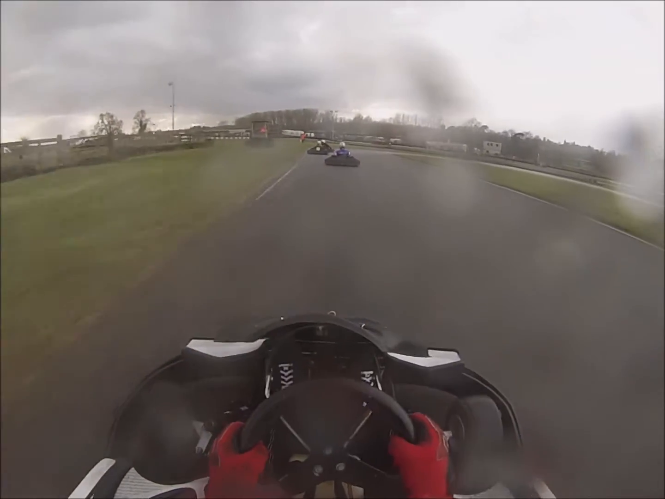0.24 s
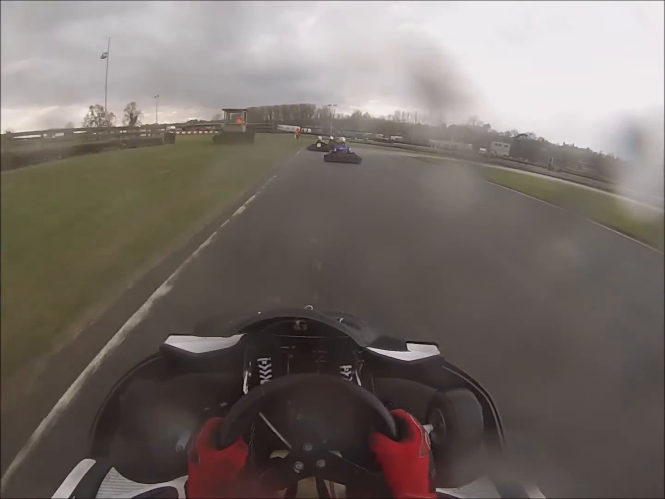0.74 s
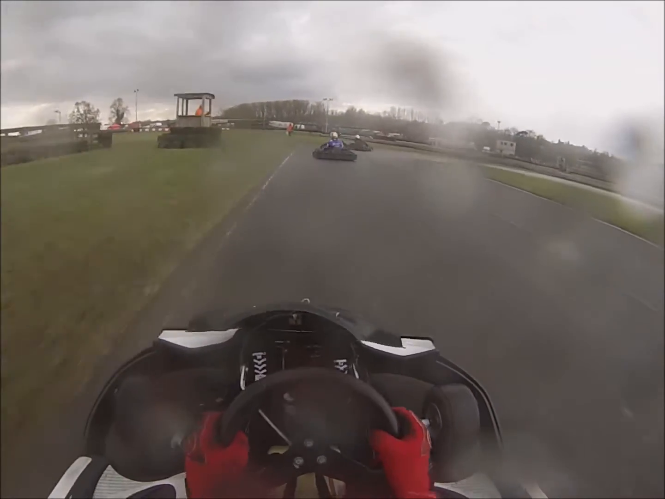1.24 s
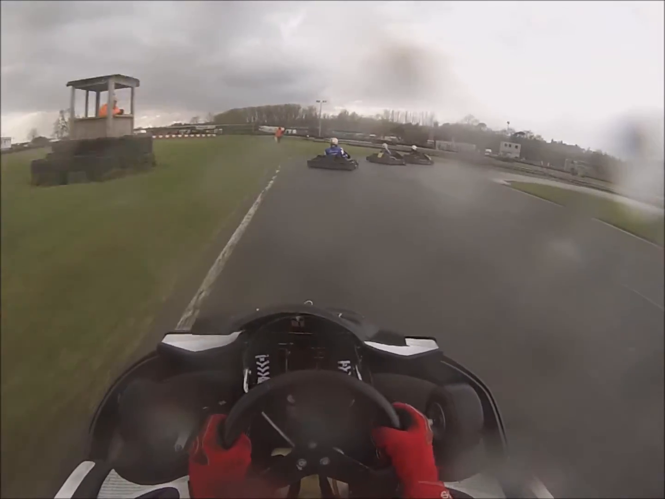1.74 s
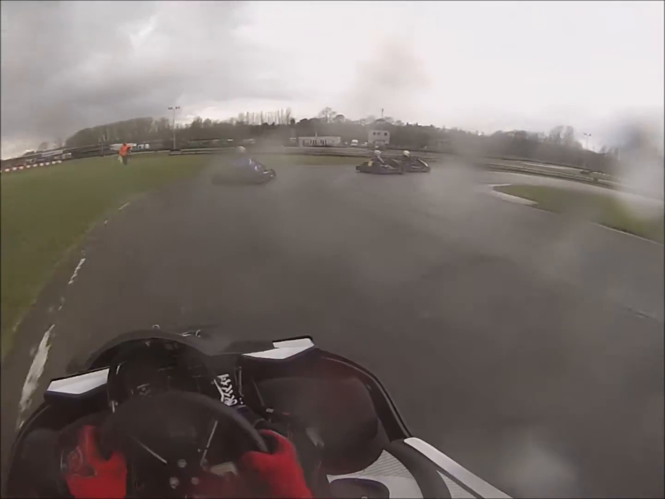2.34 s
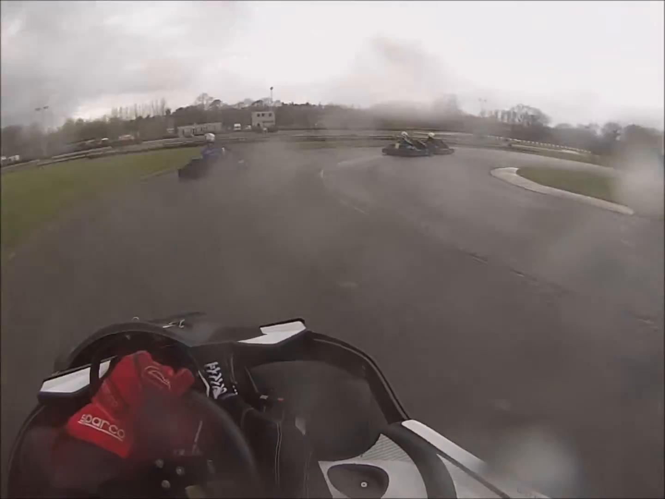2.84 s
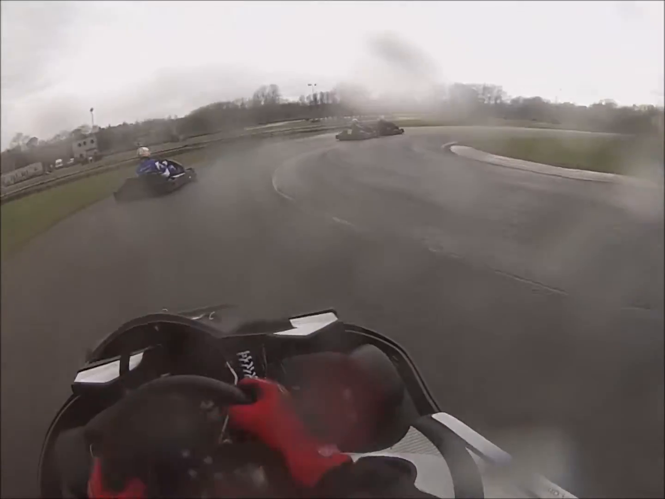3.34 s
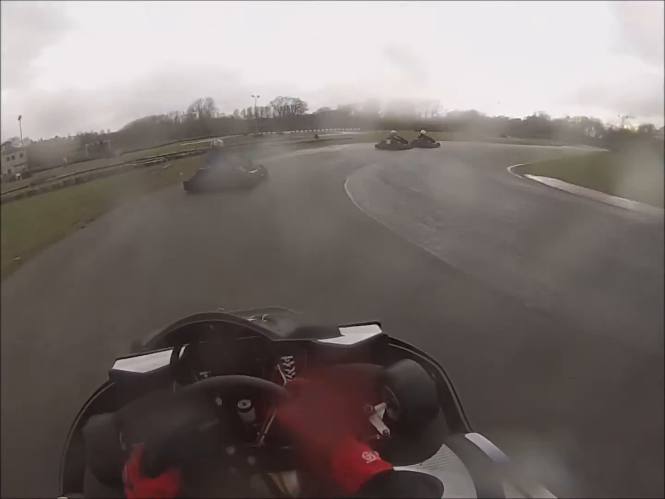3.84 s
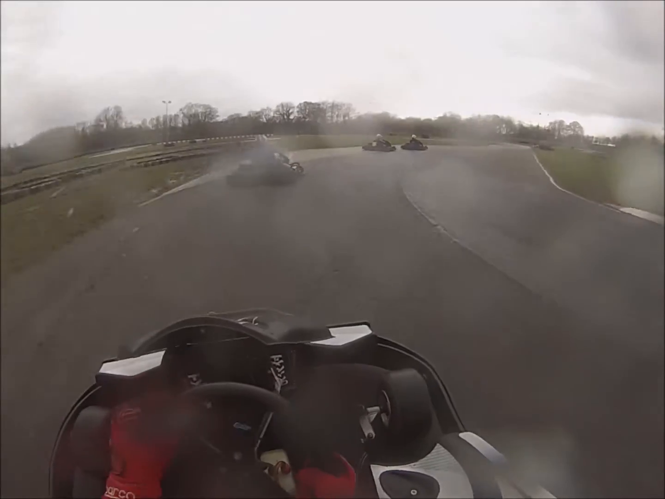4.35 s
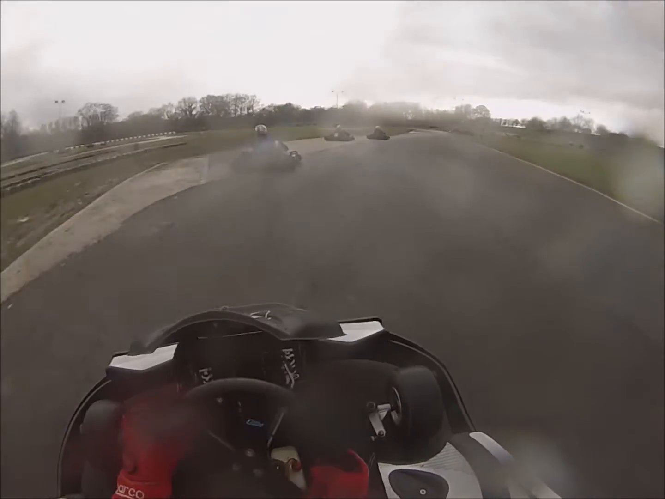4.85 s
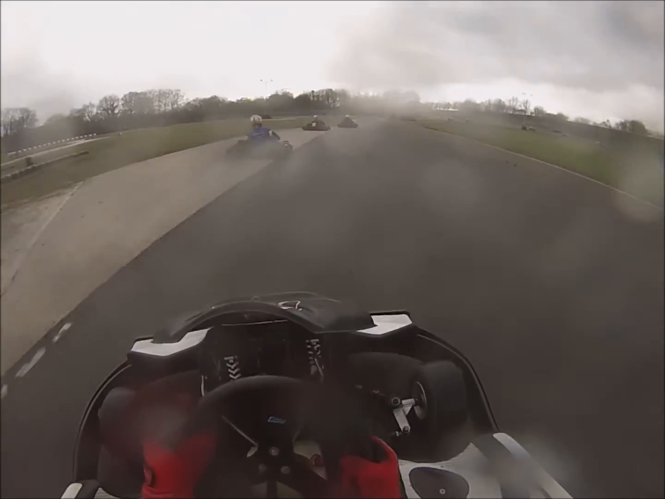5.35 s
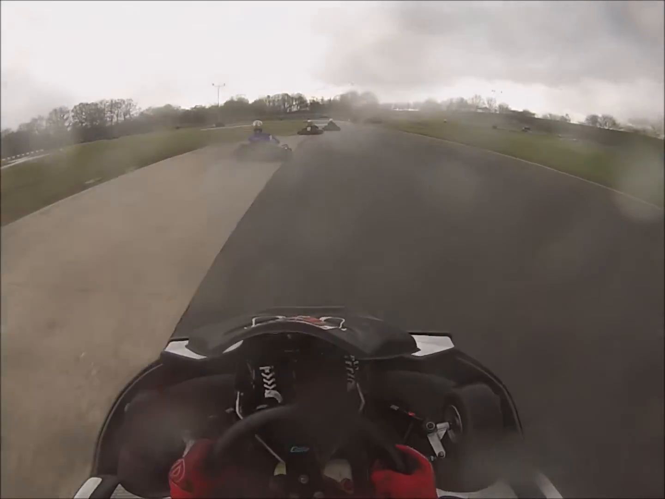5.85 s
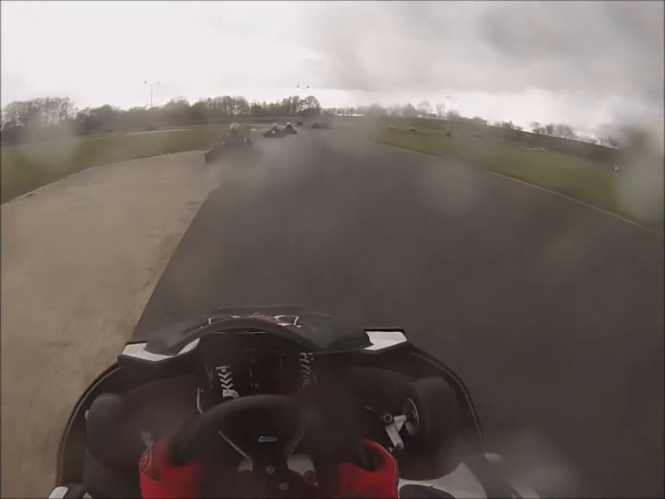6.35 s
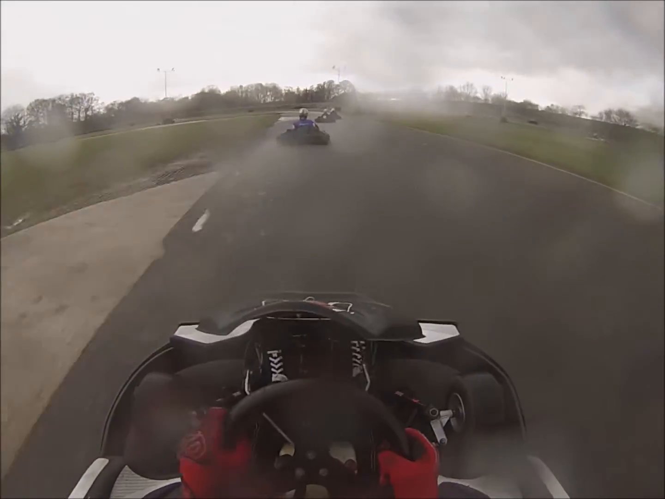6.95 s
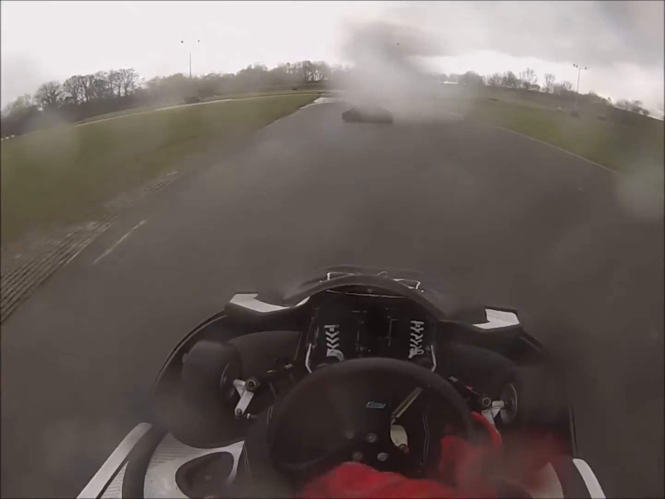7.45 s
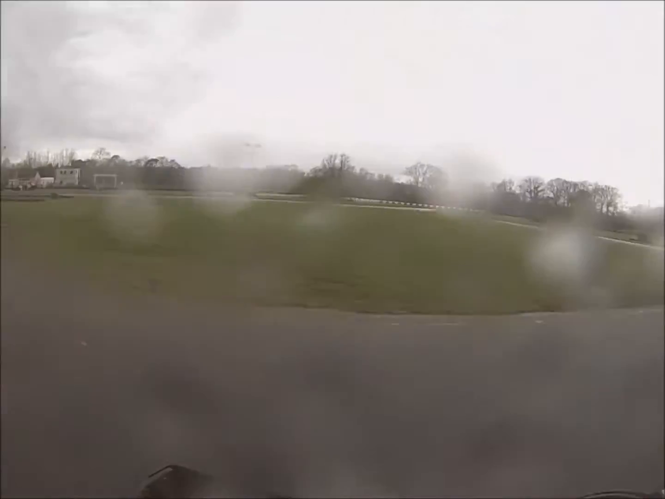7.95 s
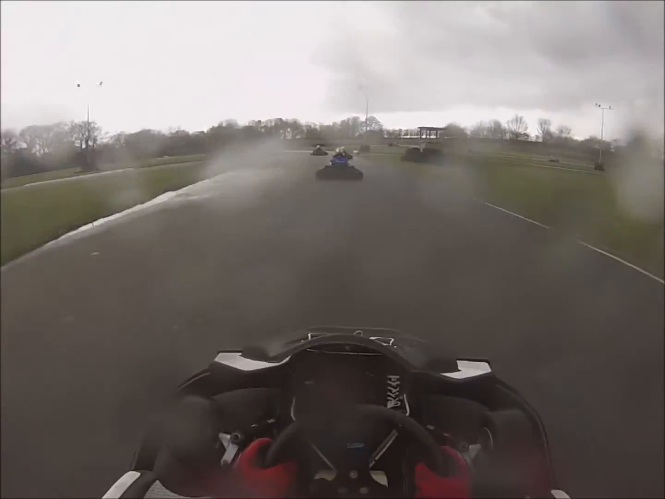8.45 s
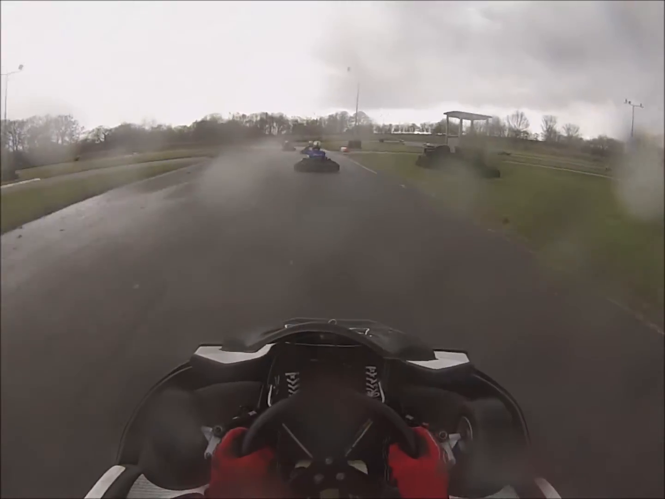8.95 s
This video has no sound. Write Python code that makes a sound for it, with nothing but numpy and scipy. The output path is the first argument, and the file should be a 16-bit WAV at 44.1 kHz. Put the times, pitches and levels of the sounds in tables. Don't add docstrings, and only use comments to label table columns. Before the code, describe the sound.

Heard from a driver's helmet through a closed camera case, a kart with two small four-stroke engines speeds along a wet track. From 0 to 2.6 s it mostly coasts: a deep seat-shaking hum slides down in pitch over road rumble, a dull drone, rattle and hissing spray, with grit ticks near 0.6, 0.8 and 1.4 s and a small ringing drop at 1.0 s. Throttle returns around 2.65 s, and near 3.0 s the clutches grab twice in a rough, chuffing shudder. Until about 6.1 s the two engines beat unevenly at slightly different speeds, with a hard tick at 5.0 s. Then they lock and climb. A very sharp stone crack lands at 6.8 s, kerb thumps and knocks at 7.7-8.0 s, with a short rumble and a swell of air. The engines keep rising, louder and rougher, to the end at 9.2 s. Brief watery gaps thin the treble throughout.

```python
import sys
import numpy as np
from scipy import signal
from scipy.fft import rfft, irfft, next_fast_len
from scipy.io import wavfile
from scipy.ndimage import uniform_filter1d, map_coordinates

SR = 44100
rng = np.random.default_rng(int(sys.argv[2]) if len(sys.argv) > 2 else 0)


def volts_from_db(level):
    exponent = np.asarray(level, float) / 20
    return 10 ** exponent


def transcribe(u):
    v = np.clip(np.atleast_2d(u).T, -1, 1)
    q = np.round(v * 32767).astype(np.int16)
    wavfile.write(sys.argv[1], SR, q)


N = 405719
TIME = np.arange(N) / SR

# time_s, rate_hz
LEFT_ENGINE = [(0, 28.5), (.5, 28.05), (1.2, 26), (1.6, 23.9), (2.4, 20.9), (2.65, 19.1), (2.82, 19.4),
               (3.0, 23.1), (3.2, 24.25), (3.7, 23.45), (4.3, 24.3), (5.6, 23.7), (5.8, 24.07), (6.1, 25.5),
               (6.4, 24.95), (7.0, 26.5), (8.0, 29.6), (9.2, 33.4)]
# time_s, rate_hz
RIGHT_ENGINE = [(2.8, 19.35), (3.0, 21.1), (3.2, 24.4), (3.45, 26.1), (4.0, 25.7), (4.4, 26.65),
                (5.3, 26.4), (5.9, 25.6), (6.1, 25.5)]
# time_s, throttle (0 to 1), running gear roar_db, weight in the seat_db
DRIVER = [(0, 0.07, -3, -3), (.55, 0.2, 1.5, 4.5), (.95, 0.1, -0.5, 2.5), (1.45, 0, -2, -11),
          (2.25, 0.12, -3.5, -2), (2.65, 0.7, -4.5, 0), (3.05, 0.77, -5.5, -5), (3.25, 0.9, -2, 2),
          (4.0, 0.8, 0, -2.5), (4.6, .8, 0, -1), (5.75, 0.76, 0.5, -0.5), (5.95, 0.7, 2, -0.5),
          (6.7, 0.71, 1.5, -0.5), (7.3, 0.83, 5, -2), (7.7, 0.73, 3.5, 0), (8.04, 0.84, 7, -8.5),
          (8.66, 0.84, 6, 0), (9.2, 1, 7, -1.5)]
# off_throttle_db, db_per_roar_db, full_throttle_gain_db
FOLLOW_DRIVER = dict(rattle=(-30.5, 0.99, 0.01), hiss=(-38, 0.51, 4), air=(-51.5, 0.64, 5.14),
                 drone=(-39.5, 0.7, 1.45), spray=(-36.5, 0.72, 0.01), rumble=(-31, 0.83, -1.2),
                 pipes=(-11.5, 0.52, 11.7))

# pitch_hz, level_db
SEAT_SECOND = [(40, -34.5), (52, -28.5), (58, -23), (67, -18.5)]
SEAT_THIRD = [(60, -33), (72, -26.5), (80, -23), (90, -30), (98, -30.5)]
SEAT_FOURTH = [(78, -37.5), (94, -29.5), (106, -24.5), (112, -33), (119, -49), (133, -39)]
# pitch_hz, level_db
PIPE = [(28, -50), (130, -51), (158, -49), (185, -56), (215, -59), (240, -54), (265, -54), (290, -50),
        (315, -61), (345, -56), (385, -53), (420, -59), (500, -53), (560, -63)]
PIPE_MULTIPLES = {1: 0, 5: 0, 6: 0, 7: 0, 8: -5, 9: -6, 10: -1, 11: 2, 12: 3, 13: -2, 14: 1, 15: -6, 16: 1,
                  17: -4, 18: -4}
# time_s, depth (ratio)
PUFF_DEPTH = [(2.98, 0.067), (3.015, 1.76), (3.065, 2.8), (3.105, 0.47), (3.2, 1.03), (3.36, 0.78),
              (3.55, 0.23), (4.6, 0.23), (5.8, 0.19), (6.3, 0.38), (7.3, 0.33), (8.1, 0.25), (8.6, .15)]
# start_s, peak_db
CLUTCH_BITES = [
    (3.01, -23),
    (3.059, -19),
]

# pitch_hz, width_hz, level_db
HOUSING = [(1433, 187, -5.5), (1670, 116, -3), (1879, 140, -3), (2134, 104, -0.5), (2327, 92, -3),
           (2530, 156, -6)]
# pitch_hz, level_db
HISS_COLOUR = [(2500, -19), (3500, -0.5), (3700, -4), (4170, 2), (4500, -1), (4800, -1), (5200, -0.5),
               (5680, 3), (6000, 0.5), (6380, 3.5), (6900, -2.5), (7300, -4.5), (7900, -20), (9500, -36)]
AIR_COLOUR = [(6500, -50), (7800, -5), (9000, 4), (10500, 1), (11200, -5), (12500, -3), (14000, -9),
              (15100, -20), (15400, -26), (15800, -70)]
DRONE_COLOUR = [(90, -56), (140, -5.5), (190, -0.5), (250, -3), (312, -5), (383, -4.5), (500, -4.5),
                (600, -8.5), (700, -9), (830, -7), (1040, -11.5), (1300, -16), (1700, -26), (2800, -100)]
RUMBLE_COLOUR = [(6, -12), (15, -8), (28, -10), (45, -12), (70, -11), (92, -7), (106, 0), (118, -6),
                 (132, -16), (170, -25), (250, -50)]
SPRAY_COLOUR = [(2300, -17), (2750, -1), (2950, 3.5), (3100, 5), (3300, -2), (3600, -13), (4200, -62)]
# pitch_hz, level_db
CRACK_COLOUR = [(1000, -38), (2000, -18), (4000, -8), (6000, -1.5), (8000, -10.5), (11000, -14),
                (14500, -21), (15400, -32), (16400, -42), (17000, -80)]

# start_s, peak_db, knock_db
BUMPS = [
    (7.657, -9, -14.5),
    (7.6935, -10.5, -6.5),
    (7.816, -16, -14),
    (8.032, -21, -19),
]
# pitch_hz, level_db, t60_s
SEAT_RINGS = [(103.7, 1, 0.28), (220, -11.5, 0.059), (285, -12, 0.062), (343, -14, 0.042), (407, -19, 0.06),
              (780, -17.5, 0.027), (1276, -21.5, 0.13)]
# start_s, peak_db, low_part_db, high_pitch_hz, low_pitch_hz
GRIT = [(0.0748, -29, 12.5, 5740, 2970), (0.5781, -11, -1, 5630, 2090), (0.7631, -9, -29, 4430, 1800),
        (0.7748, -23, -15, 6480, 2120), (1.3688, -22.5, 4, 6150, 2100), (1.4234, -6, -7, 3670, 2180),
        (2.8144, -25, -3, 5850, 1810), (2.8528, -34, 13, 6480, 3050), (2.8721, -14.5, 5.5, 4580, 3000),
        (5.0348, -4.5, -6, 6500, 2550), (5.0473, -20.5, 4, 5630, 2920), (6.8055, -0.5, -8, 5630, 2150),
        (6.8068, -13, -4.5, 8040, 3870), (7.1445, -18, -15, 6160, 2000), (8.421, -12, -25, 12200, 2500)]
# start_s, peak_db, low_part_db, high_pitch_hz, low_pitch_hz
DROPS = [
    (.587, -27, 11, 6260, 2640),
    (1.034, -21.5, -6, 4830, 2070),
]
# time_s, how far a tone must stand out to survive_db
GAPS = [(.151, -10), (0.774, -16), (1.131, 6.5), (1.645, 3.5), (2.114, 6), (2.157, 5), (2.37, 7),
        (2.455, 6.5), (3.118, 1.5), (3.545, 7), (4.141, 5.5), (4.268, 5.5), (4.419, 7.5), (4.526, 3.5),
        (4.611, 6), (4.696, 4.5), (4.78, 6.5), (5.144, 3.5), (5.25, 4.5), (5.613, 5), (5.999, 5.5),
        (6.083, 3.5), (6.36, 5), (6.402, 5.5), (8.067, 2), (8.598, 2.5), (8.855, 2)]

SLIP_START_S, SLIP_END_S, SLIP_EDGE_S = 3.1, 6.1, .1
RIGHT_SECOND_DB, RIGHT_FOURTH_DB = -1, -8
LOCKED_DB = 3
THIRD_FADES_DB = 29
LOOSE_DB, SLACK_DB = 1.5, 1.8
BITE_RISE_S, BITE_T60_S = 0.0063, 0.16
LOOK_S, LOOK_LASTS_S, LOOK_DB = 8.03, 0.26, 4
KERB_S, KERB_LASTS_S, KERB_DB = 7.88, 0.051, 8
CRACK_LASTS_S, STIFFNESS = .014, 1.6
DROP_LASTS_S = .1
GAP_SAMPLES = 1882
TOP_HZ, INPUT_HZ = 15350, 16400


def unit(x):
    return x / np.sqrt(np.mean(x ** 2) + 1e-20)


def along(points, hz):
    f, v = np.transpose(points)
    return np.interp(np.log(hz + 1), np.log(f + 1), v)


def curves(rows, outside=None):
    s, *columns = np.transpose(rows)
    return [np.interp(TIME, s, column, outside, outside) for column in columns]


def wobble(rate_hz):
    step = max(1, int(SR / rate_hz / 30))
    coarse = TIME[::step]
    knots = rng.standard_normal(int(N * rate_hz / SR) + 4)
    return np.interp(TIME, coarse, map_coordinates(knots, [coarse * rate_hz]))


def filtered(x, response):
    m = next_fast_len(N + SR // 2)
    return irfft(rfft(x, m) * response(np.fft.rfftfreq(m, 1 / SR)), m)[:N]


def coloured(x, colour):
    return unit(filtered(x, lambda hz: volts_from_db(along(colour, hz))))


def gritty(grain_db):
    return unit(rng.standard_normal(N) * volts_from_db(grain_db * wobble(700)))


def level(layer):
    throttle, roar_db, _ = curves(DRIVER)
    off_db, per_roar, full_db = FOLLOW_DRIVER[layer]
    return volts_from_db(off_db + per_roar * roar_db + full_db * throttle)


def firings():
    left_hz = curves(LEFT_ENGINE)[0]
    right_hz = curves(RIGHT_ENGINE, outside=0)[0]
    right_hz = np.where(right_hz > 0, right_hz, left_hz)
    return np.cumsum(left_hz) / SR, np.cumsum(right_hz) / SR


def tone(cycles, multiple, db):
    phase = 2 * np.pi * (multiple * cycles + rng.random())
    return np.sqrt(2) * volts_from_db(db) * np.sin(phase)


def engines(left, right):
    throttle, _, seat_db = curves(DRIVER)
    coasting = (TIME > 1.2) * (TIME < SLIP_START_S)
    loose_db = LOOSE_DB + SLACK_DB * coasting
    apart = np.clip(np.minimum(TIME - SLIP_START_S, SLIP_END_S - TIME) / SLIP_EDGE_S, 0, 1)

    def shake(cycles, multiple, seat, db):
        answer_db = along(seat, multiple * np.gradient(cycles) * SR)
        return tone(cycles, multiple, answer_db + seat_db + db + loose_db * wobble(8))

    low = shake(left, 2, SEAT_SECOND, 0)
    low += shake(left, 3, SEAT_THIRD, THIRD_FADES_DB * (np.minimum(throttle, 1) - 1))
    low += shake(left, 4, SEAT_FOURTH, 0)
    low += apart * shake(right, 2, SEAT_SECOND, RIGHT_SECOND_DB)
    low += apart * shake(right, 4, SEAT_FOURTH, RIGHT_FOURTH_DB)

    pipes = np.zeros(N)
    for cycles, share in ((left, volts_from_db(LOCKED_DB * (1 - apart))), (right, apart)):
        rate_hz = (np.gradient(cycles) * SR).astype(np.float32)
        shaken = cycles + .008 * wobble(5)
        for multiple, db in PIPE_MULTIPLES.items():
            pipe_db = along(PIPE, multiple * rate_hz) + db + 3.1 * wobble(3)
            pipes += share * tone(shaken, multiple, pipe_db)
    return low + level("pipes") * pipes


def puffs(right, sharp):
    depth = sharp * np.clip(curves(PUFF_DEPTH)[0], 0, 8)
    cycle = (right - np.interp(3.0615, TIME, right) + .5) % 1 - .5
    swell = np.exp(-(cycle / np.where(cycle < 0, .1, .18)) ** 2)
    size = volts_from_db(2.2 * wobble(25))
    return 1 / (1 + 0.067 * depth) + 1.51 * depth * swell * size


def housing(hz):
    total = 0
    for k, (centre, width, db) in enumerate(HOUSING):
        resonance = 1j * hz * width / (centre * centre - hz * hz + 1j * hz * width)
        total = total + (-1) ** k * volts_from_db(db) * resonance
    return total


def rush(gate, air_gate):
    surge = volts_from_db(0.61 * wobble(12))
    rattle = unit(filtered(gritty(grain_db=1.2), lambda hz: housing(hz) * hz ** 2 / (hz ** 2 + 900 ** 2)))
    grains = gritty(grain_db=1.5)
    hiss = level("hiss") * coloured(grains, HISS_COLOUR)
    look_db = LOOK_DB * np.exp(-((TIME - LOOK_S) / LOOK_LASTS_S) ** 2)
    air = level("air") * volts_from_db(look_db + 2.2 * wobble(5.9)) * coloured(grains, AIR_COLOUR)
    drone = level("drone") * coloured(gritty(grain_db=1.0), DRONE_COLOUR)
    return surge * (gate * (level("rattle") * rattle + hiss) + air_gate * air) + drone


def bites():
    shape = np.zeros(N)
    for s, db in CLUTCH_BITES:
        rise = 1 - np.exp(-np.clip(TIME - s, 0, 1) / BITE_RISE_S)
        shape += volts_from_db(db - 60 * np.abs(TIME - s) / BITE_T60_S) * rise
    return shape * unit(filtered(gritty(grain_db=2.5), housing))


def road(gate):
    strip_db = KERB_DB * np.exp(-((TIME - KERB_S) / KERB_LASTS_S) ** 2)
    rumble = coloured(rng.standard_normal(N), RUMBLE_COLOUR)
    rumble *= level("rumble") * volts_from_db(strip_db + 0.76 * wobble(6.9))
    spray = coloured(gritty(grain_db=1.5), SPRAY_COLOUR)
    spray *= level("spray") * volts_from_db(1.04 * wobble(15) + 1.05 * wobble(3.23))
    return rumble + gate * spray


def bumps():
    out, t = np.zeros(N + SR), np.arange(SR // 2) / SR
    rings = [volts_from_db(db - 60 * t / t60) * np.sin(2 * np.pi * hz * t) for hz, db, t60 in SEAT_RINGS]
    rise = 1 - np.exp(-t / 0.001)
    for s, db, knock_db in BUMPS:
        thump = rings[0] + volts_from_db(knock_db + 15.0) * sum(rings[1:])
        out[round(s * SR):][:len(t)] += volts_from_db(db + 2.0) * thump * rise
    return out[:N]


def grit():
    cracks, rings, t = np.zeros(N + SR), np.zeros(N + SR), np.arange(SR // 8) / SR
    hits = [(*row, CRACK_LASTS_S * (2100 / row[-1]) ** STIFFNESS) for row in GRIT]
    hits += [(*row, DROP_LASTS_S) for row in DROPS]
    for s, db, low_db, high_hz, low_hz, t60 in hits:
        at = round((s + 0.00057) * SR)
        crack = volts_from_db(db - 250 * t / t60) * (1 - np.exp(-t / (0.012 * t60)))
        ring = volts_from_db(db - 60 * t / 0.011) * (1 - np.exp(-t / 0.0001))
        high = 0.52 * np.sin(2 * np.pi * high_hz * t)
        low = volts_from_db(low_db + 1 + 25 * t / 0.02) * np.sin(2 * np.pi * low_hz * t)
        cracks[at:][:len(t)] += 6.5 * crack * rng.standard_normal(len(t))
        rings[at:][:len(t)] += ring * (high + low)
    return filtered(cracks[:N], lambda hz: volts_from_db(along(CRACK_COLOUR, hz))) + rings[:N]


def scene():
    left, right = firings()
    gate, air_gate = puffs(right, sharp=1.0), puffs(right, sharp=1.8)
    kart = engines(left, right) + rush(gate, air_gate) + bites() + road(gate) + bumps()
    return (filtered(kart, lambda hz: hz < TOP_HZ) + grit())[None]


def thin_out(x):
    out, turn = x.copy(), np.pi * (np.arange(GAP_SAMPLES) + .5) / GAP_SAMPLES
    hz = np.fft.rfftfreq(GAP_SAMPLES, 1 / SR)
    for s, keep_db in GAPS:
        middle = round(s * SR)
        at = slice(middle - GAP_SAMPLES // 2, middle + GAP_SAMPLES // 2)
        tones = rfft(x[at] * np.sin(turn))
        stand_out = uniform_filter1d(abs(tones), size=2) / uniform_filter1d(abs(tones), size=121)
        kept = 1.9 / (1 + (volts_from_db(keep_db) / stand_out) ** 12) / (1 + (hz / 7000) ** 16)
        lost = irfft(tones * (1 - kept) / (1 + (350 / (hz + 1)) ** 8), GAP_SAMPLES)
        out[at] -= lost * (1 - abs(np.cos(turn))) / np.sin(turn)
    return out


def low_pass(x):
    return signal.sosfilt(signal.butter(12, 16510, fs=SR, output="sos"), x)


def record(dry):
    soft = dry[0] / (1 + abs(dry[0] / .88) ** 6) ** (1 / 6)
    limited = filtered(soft, lambda hz: 1 / (1 + (hz / INPUT_HZ) ** 60))
    return low_pass(thin_out(limited)[None])


dry = scene()
out = record(dry)
transcribe(out)
```